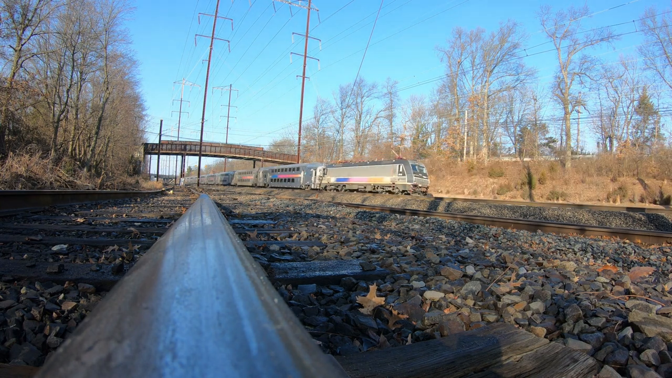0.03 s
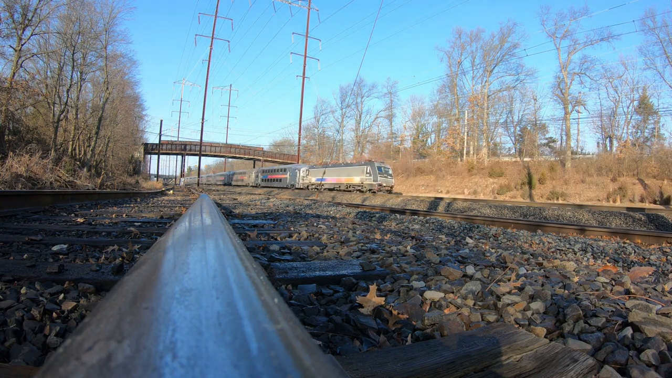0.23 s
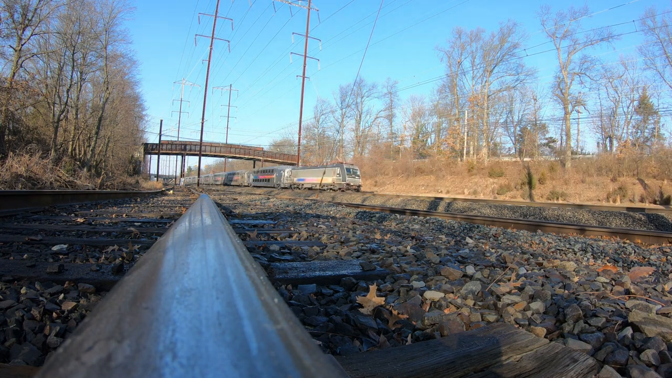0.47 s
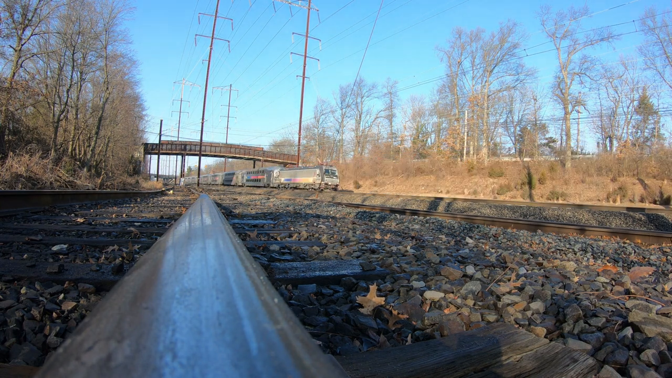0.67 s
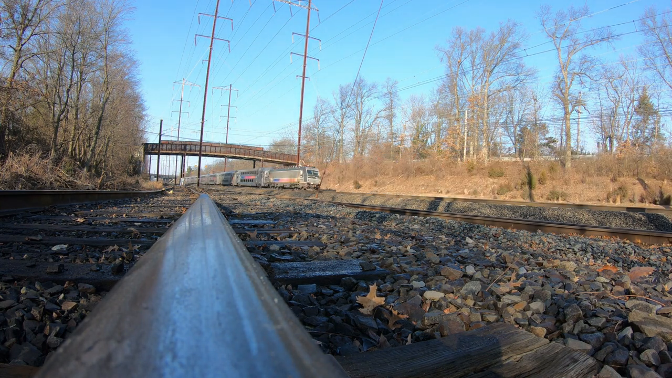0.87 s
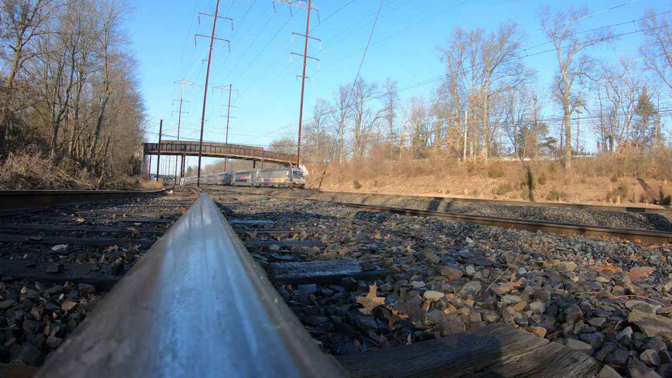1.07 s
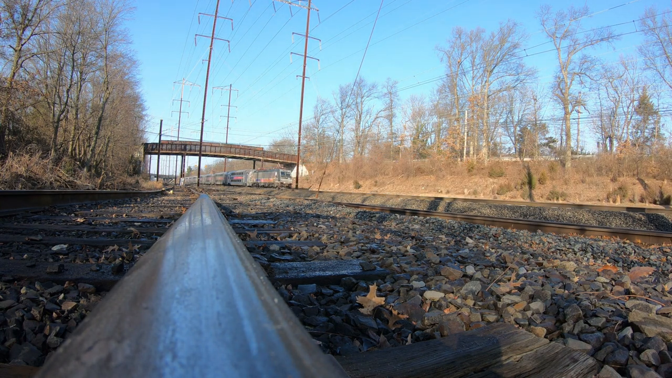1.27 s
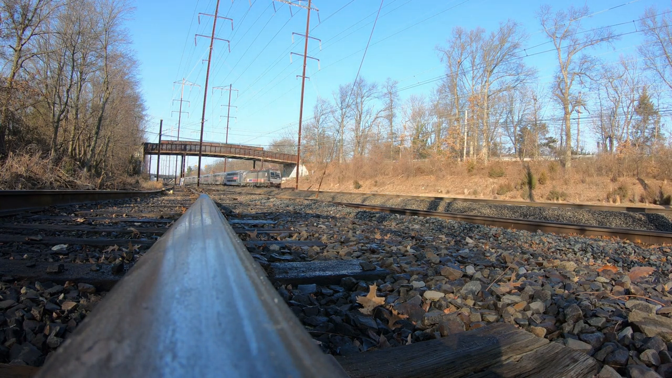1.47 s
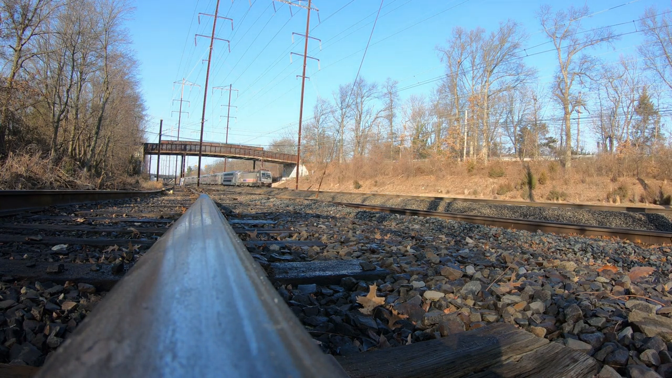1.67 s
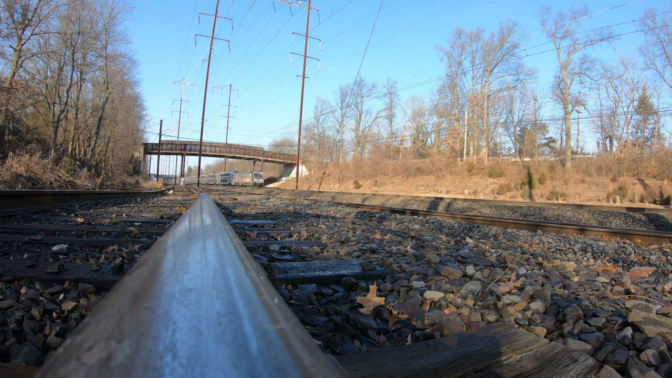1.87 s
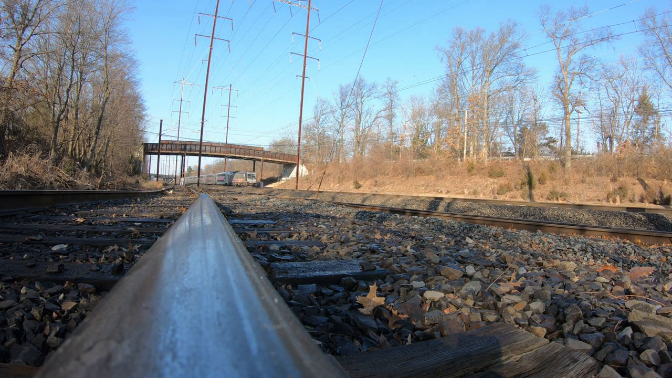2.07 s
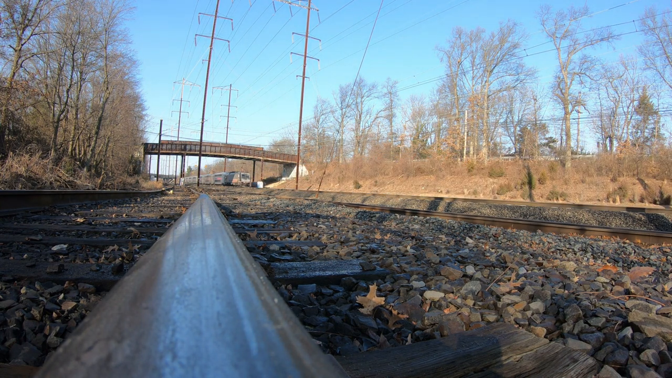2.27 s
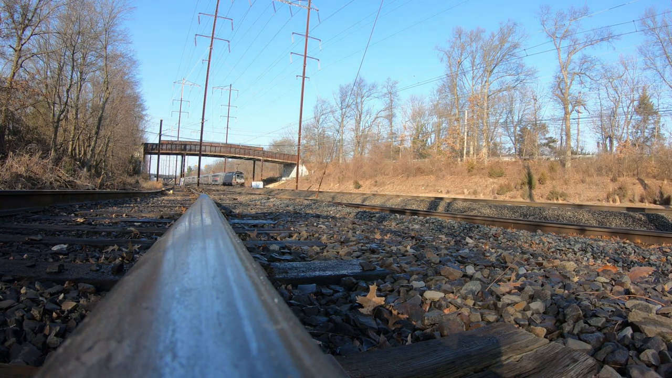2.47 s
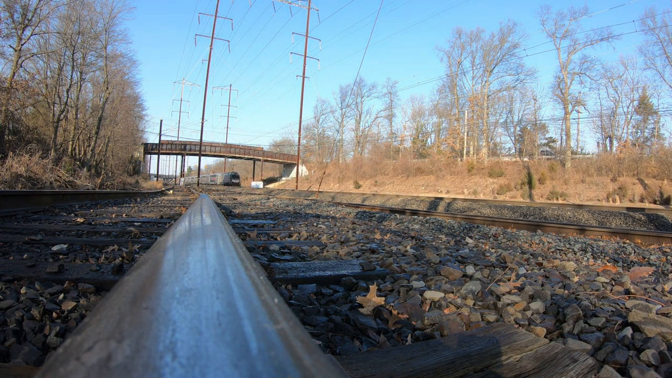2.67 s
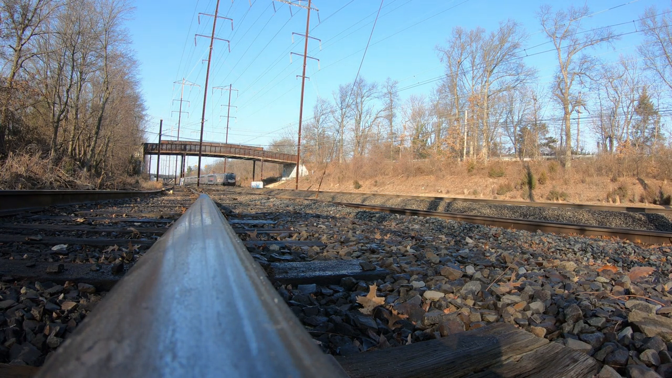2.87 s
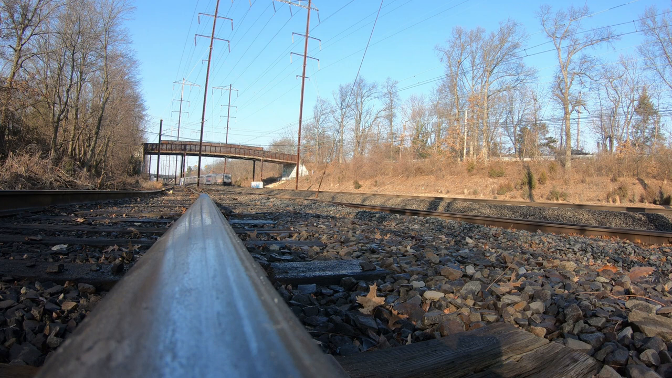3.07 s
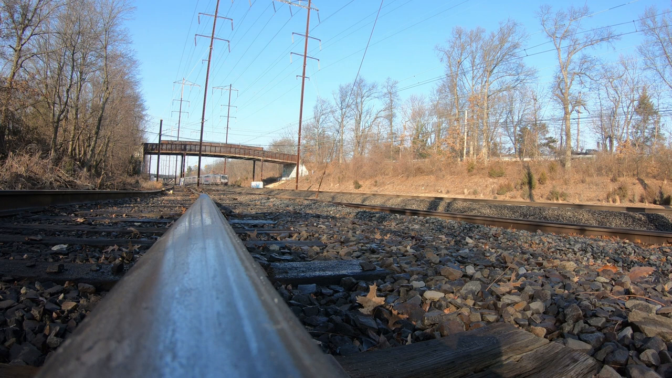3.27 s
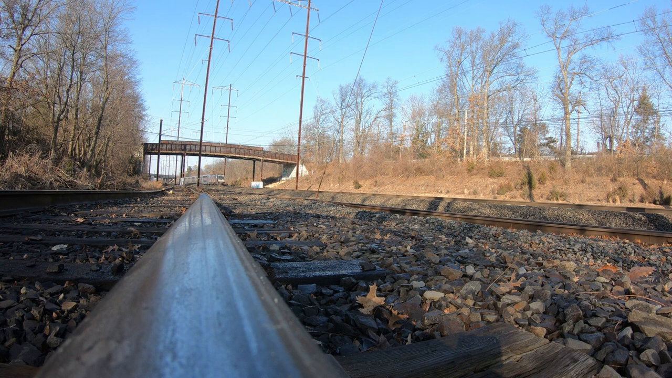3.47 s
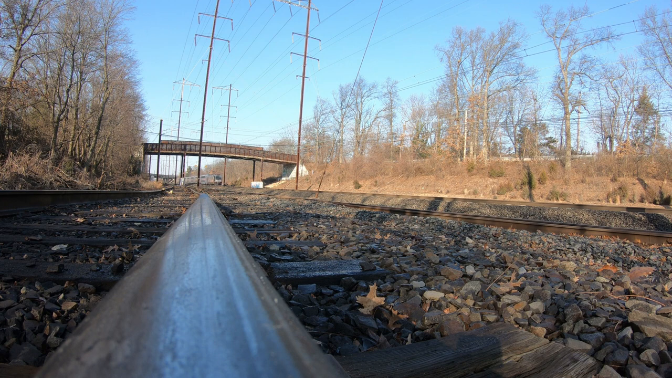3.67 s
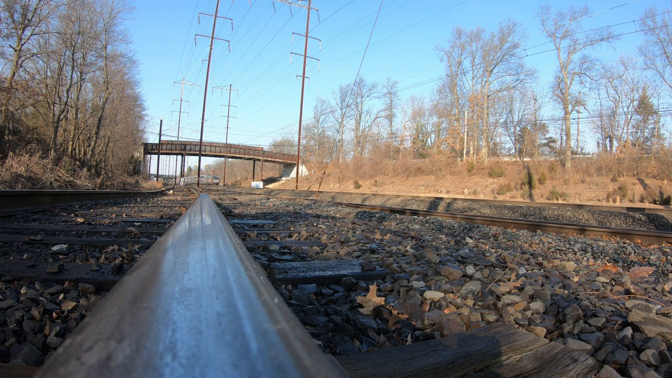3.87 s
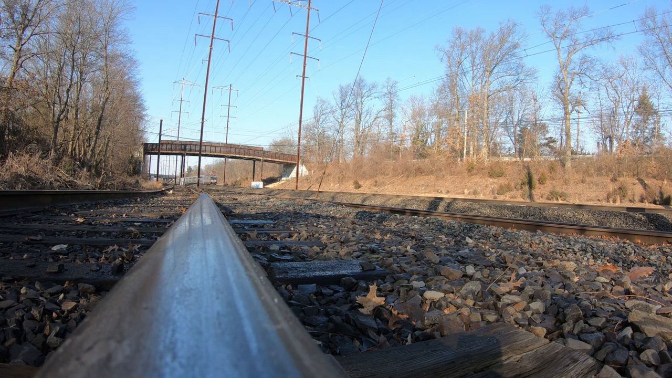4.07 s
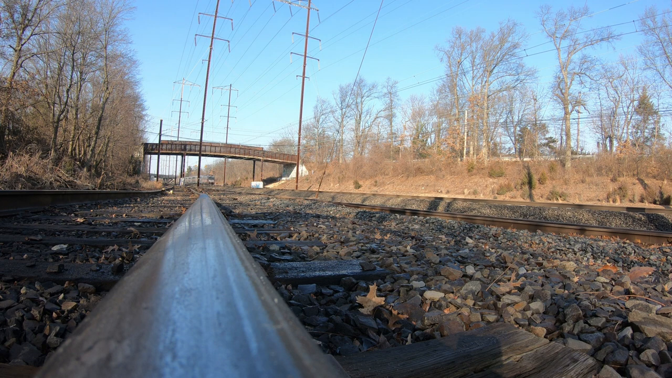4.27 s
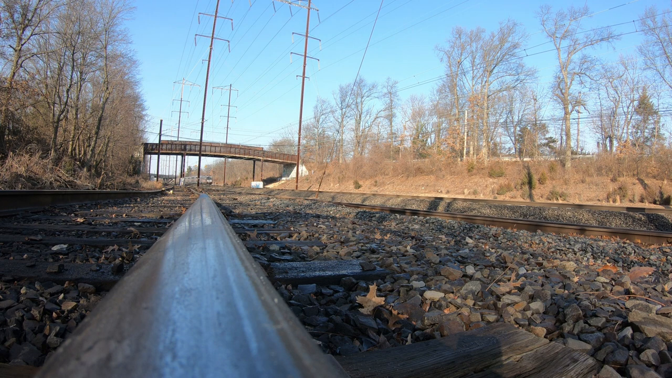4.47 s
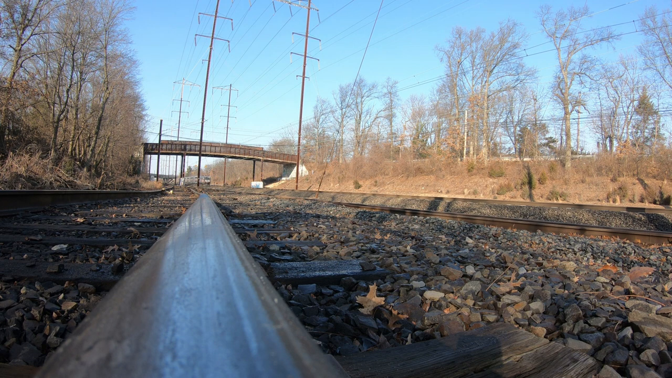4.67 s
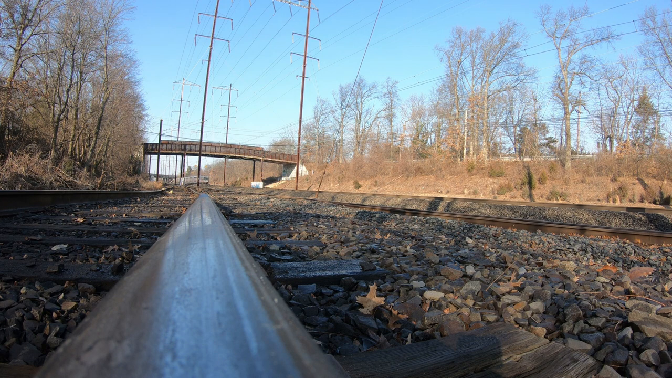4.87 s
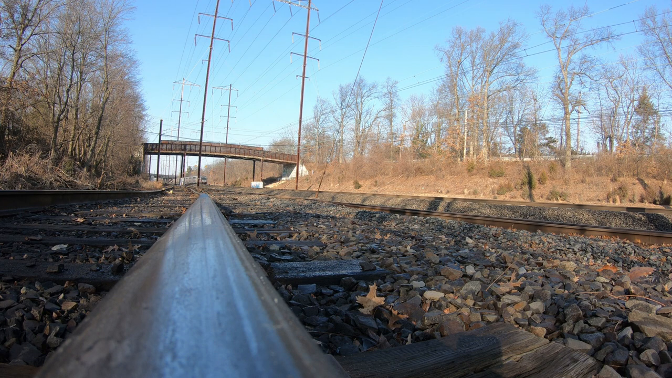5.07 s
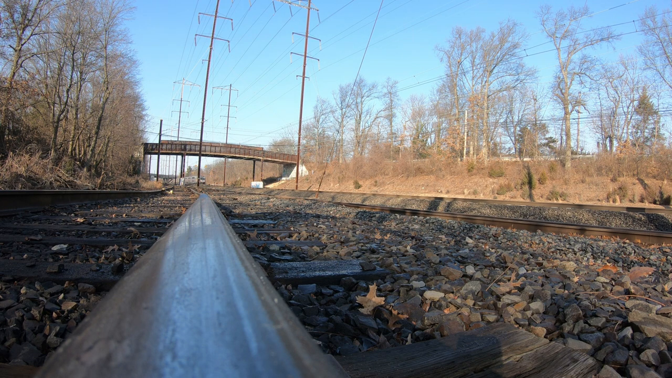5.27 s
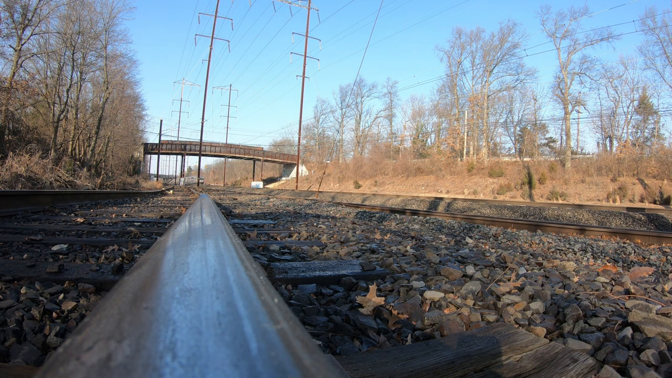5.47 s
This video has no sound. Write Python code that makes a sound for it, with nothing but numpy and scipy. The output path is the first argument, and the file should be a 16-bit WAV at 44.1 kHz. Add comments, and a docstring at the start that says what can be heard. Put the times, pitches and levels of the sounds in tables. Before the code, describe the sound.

Heavy low train rumble and hollow wheel roar draw away outdoors, treble dulling first, leaving a soft hum and brief high birdsong.

```python
"""An electric passenger train draws away along a neighbouring track, heard from just above a rail.
Broad noise and wandering low tones make its heaving rumble; resonant noise makes the wheel roar, whose
treble dies first with distance. A rough drive whine is a gliding tone with its own scatter.
Noise swells make scrubs and a fizz that comes and goes; near the end a small bird's gliding sines twitter."""
import sys
import numpy as np
from scipy import signal
from scipy.fft import rfft, irfft, next_fast_len
from scipy.io import wavfile
from scipy.ndimage import uniform_filter1d, minimum_filter1d

SR = 44100
rng = np.random.default_rng(int(sys.argv[2]) if len(sys.argv) > 2 else 0)


def pcm_store(signal):
    """Save signal as 16-bit PCM."""
    levels = np.round(np.clip(np.atleast_2d(signal), -1, 1) * 32767)
    wavfile.write(sys.argv[1], SR, levels.astype(np.int16).T)


N = 243431
TIME = np.arange(N) / SR
SIZE = next_fast_len(N, True)
BIN_HZ = np.maximum(np.fft.rfftfreq(SIZE, 1 / SR), 1)

# Stereo field, left minus right: f/Hz, level difference/dB
STEREO_LEAN = [(30, 10), (72, 15), (115, 15.5), (155, 12), (240, 10), (320, 9.5), (700, 0), (1150, -3),
               (1400, -6), (1750, -2.5), (2600, 0), (3400, -2.5), (5200, 2), (7900, 4.5), (10000, 0.5)]
# Coherence of left and right: f/Hz, coherence/1
COHERENCE = [(30, 0.5), (70, 1), (115, 0.99), (160, 0.57), (370, 0.77), (720, 1), (1450, 0.1), (1750, 0.3),
             (2200, 0.3), (3100, 0.4), (3900, 0.9), (5500, 0.29), (9000, 0.04), (13000, 0.33)]
# Phase by which the left leads: f/Hz, phase/rad
PHASE_LEAD = [(50, 0.9), (170, -1), (400, -1.77), (750, -2), (1350, -2.5), (1800, 0.27), (3800, -1.13),
              (7000, 1.6)]

# Spectrum of the open-air hiss: f/Hz, relative density/dB
AIR_SPECTRUM = [(5000, 0.5), (7500, -1.5), (8300, -6.5), (10000, -5)]
AIR_DB, FAR_ROAR_DB = -86, -61

# Bird's whistles, each a glide: t/s, length/s, start f/Hz, end f/Hz, level before flutter/dB
BIRD_NOTES = [(4.48, .045, 7500, 6950, -90), (4.53, .05, 7000, 7950, -80), (4.565, .05, 7900, 7700, -81),
              (4.58, 0.033, 7350, 7700, -81), (5.008, .045, 9350, 7900, -86),
              (5.045, 0.088, 7800, 7750, -82), (5.075, .04, 6150, 6800, -82), (5.12, 0.08, 7850, 7200, -80),
              (5.2, .145, 7500, 8000, -82), (5.34, 0.043, 7950, 7400, -85), (5.378, .028, 6100, 6330, -83)]
# Bird's toneless churrs: t/s, length/s, level before flutter/dB
BIRD_CHURRS = [(5.04, .05, -89), (5.13, .06, -85)]
# Bird's direct sound and its echoes from the trees: delay t/s, level/dB
BIRD_PATHS = [(0, 0), (.019, -8.5), (.043, -18)]
NOTE_EDGE_S, CHURR_HZ = 0.0092, 8300

# Spectrum of the sizzle: f/Hz, relative density/dB
SIZZLE_SPECTRUM = [(8000, 3.5), (10000, -4), (11000, -4.5), (12400, -3.5), (13400, -5.5), (14000, -11.5),
                   (15000, -23)]
# Spurts of sizzle: t/s, length/s, level before flicker/dB
SIZZLE_SPURTS = [(0.143, 0.18, -79), (0.408, 0.24, -75.5), (0.777, 0.22, -82), (1.31, .16, -80),
                 (1.68, .09, -83)]
SIZZLE_DB, SIZZLE_FOLLOWS = -83.5, 0.7   # fizz at midway; dB per dB of rolling level
SIZZLE_FLICKER_DB = 1.2

# Spectrum of a scrubbing wheel's hiss: f/Hz, relative density/dB
SCRUB_SPECTRUM = [(4200, 3.5), (5200, 0.5), (6500, -0.5), (7800, -0.5), (9300, -9.5), (11000, -18.5),
                  (13000, -28)]
# Moments when a wheel scrubs the rail: t/s, length/s, sing level/dB, hiss level/dB
SCRUB_EVENTS = [(.14, 0.38, -61, -73.5), (0.42, 0.088, -52, -75), (0.76, 0.32, -51, -63.5),
                (1.253, 0.42, -66, -74)]
SCRUB_HZ, SCRUB_WIDTH_HZ = 757, 82

# Strength of the wheels' hollow ringing: t/s, level/dB
RINGING_LEVEL = [(0, -67), (1.5, -69), (2.3, -61.5), (2.65, -56.5), (3.05, -61), (3.42, -59.5),
                 (3.75, -63.5), (5.52, -64.5)]
RINGING_HZ, RINGING_WIDTH_HZ = 725, 73

# Level of the direct drive whine before flutter: t/s, level/dB
WHINE_LEVEL = [(0, -68.5), (.8, -70.5), (1.35, -73.5), (1.65, -63), (2.03, -55), (2.3, -62.5), (2.56, -64),
               (2.8, -60), (3.13, -53), (3.42, -61.5), (3.6, -67.5), (3.8, -65.5), (4.27, -61.5),
               (4.6, -67.5), (5.25, -65.5), (5.52, -71)]
WHINE_HZ, WHINE_RISE_HZ_PER_S = 686.3, 1.35
WHINE_SCATTER, WHINE_BLUR_HZ = .95, 20   # scatter relative to the direct tone; its spread
OCTAVE_DB, OCTAVE_FOLLOWS = -70, 0.64   # octave at the whine's mean level; dB per dB of the whine

# Common level of the hum, which outlasts the rumble: t/s, level/dB
HUM_LEVEL = [(0, -41.5), (.9, -33), (2.4, -38), (3.8, -41), (5.52, -42.5)]
# Resonances of the hum: f/Hz, width/Hz, relative level/dB, left minus right/dB
HUM_RESONANCES = [(108, 12.2, -0.5, 1), (242.9, 13, -19, 8)]

# Surges of wheelsets on the track bed: t/s, length/s, f before wander/Hz, level before unevenness/dB
SURGE_EVENTS = [(0.185, 0.12, 76, -22.5), (0.25, 0.15, 45, -23), (0.419, 0.14, 78, -25.5),
                (0.665, 0.16, 77, -22.5), (1.182, 0.26, 52, -22.5), (1.832, 0.44, 53, -26),
                (2.282, 0.11, 54, -22.5), (2.998, 0.18, 52, -28.5), (3.14, 0.063, 79, -22.5),
                (3.46, 0.16, 53, -26.5), (3.818, 0.25, 53, -27), (4.142, 0.17, 55, -31),
                (4.484, .14, 52, -30), (5.042, 0.2, 52.1, -31.5)]
# Level of the lower rumble before bass limiting: t/s, level/dB
RUMBLE_LEVEL = [(0, -21.5), (.3, -25.5), (.55, -26.5), (.95, -24.5), (1.36, -23), (1.46, -31), (1.7, -23.5),
                (2.03, -24), (2.14, -30.5), (2.24, -25), (2.42, -23), (2.55, -26.5), (2.9, -29.5),
                (3.25, -28.5), (3.8, -29.5), (4.0, -30.5), (4.27, -27.5), (4.35, -36.5), (4.45, -37),
                (4.65, -30.5), (4.82, -34.5), (5.05, -31), (5.29, -37), (5.38, -34), (5.52, -33.5)]
# Level of the upper rumble before bass limiting: t/s, level/dB
DRONE_LEVEL = [(0, -40), (1.3, -43), (1.8, -41), (2.48, -43.5), (2.68, -46), (3.16, -45.5), (3.7, -47.5),
               (4.32, -44.5), (5.52, -48.5)]
# Spectrum of the rumble: f/Hz, relative density/dB
RUMBLE_SPECTRUM = [(10, -34.5), (20, -19), (30, -10), (41, -1), (52, 0), (65, 1.5), (77, -1.5), (92, -4),
                   (120, -9.5), (150, -14.5), (200, -21), (245, -25.5), (280, -32.5), (400, -32)]

# Guide level of the receding rolling noise, steering registers and sizzle: t/s, level/dB
ROLLING_LEVEL = [(0, -54), (.56, -57.5), (.95, -58), (1.7, -59), (2.04, -60), (2.56, -58.5), (3.12, -61),
                 (3.7, -63), (4.28, -64), (4.8, -66), (5.52, -67.8)]
# Level of the wheels' low roar before flicker: t/s, level/dB
ROAR_LEVEL = [(0, -47), (1.3, -50), (2.1, -50.5), (2.3, -50), (3.5, -53), (3.8, -56), (5.08, -57),
              (5.52, -55.5)]
# Spectrum of the rolling noise: f/Hz, relative density/dB
ROLLING_SPECTRUM = [(250, 5), (380, -2), (480, -2.5), (720, -0.5), (1000, -2.5), (1400, -4), (1550, -7.5),
                    (1950, -8), (2250, -11), (3200, -14), (3950, -14.5), (4250, -18.5), (5200, -23.5),
                    (7500, -26), (9500, -37.5)]
# Ringing of wheels and rail: f/Hz, width/Hz, level above the roar/dB
RAIL_RESONANCES = [(473, 75, 5), (581, 24, 4.5), (640, 68, 1.5), (758, 22, 2), (1370, 90, 1),
                   (1850, 110, 2)]
# Registers above the roar, the higher fading faster:
# low f/Hz, high f/Hz, midway level/dB, slope/(dB per dB of rolling level), flicker/dB
ROLLING_REGISTERS = [(1089, 2123, -53.5, 0.89, 0.17), (2162, 4005, -58.5, 1.24, 0.67),
                     (4170, 6730, -68.5, 1.77, 0.65), (7000, 11000, -80.5, 3, 1.2)]
# Balance of the wheels, shifting slightly right: t/s, left minus right/dB
WHEEL_BALANCE = [(0, 0.4), (1.2, -0.5), (2.4, -0.1), (5.52, -1.5)]
MIDWAY_DB = -58.5   # rolling level at which the registers have their midway levels
FLICKER_PER_S = 5.2

BASS_LIMIT_DB, BASS_SPLIT_HZ, LIMITER_S = -12.5, 160, 0.023   # threshold, upper edge, smoothing
CUTOFF_HZ = 15100


def from_db(db):
    """Amplitude ratio: a level in decibels is twenty times its decimal logarithm."""
    return 10 ** (np.asarray(db) / 20)


def rms_one(pair):
    """Normalization: a stereo pair is scaled until the mean of its channels has rms 1."""
    middle = pair.mean(0)
    return pair / np.sqrt(np.mean(middle ** 2) + 1e-20)


def in_time(rows):
    """Linear interpolation: the columns of a curve at every sample."""
    s, *columns = np.transpose(rows)
    return [np.interp(TIME, s, c) for c in columns]


def at_hz(points, hz):
    """Logarithmic pitch scale: a table is interpolated over log frequency."""
    f, value = np.transpose(points)
    return np.interp(np.log(hz), np.log(f), value)


def drift(rate_hz):
    """Random modulation: low-passed noise of unit spread, 6 dB down at the given rate."""
    spectrum = rfft(rng.standard_normal(SIZE)) / (1 + (BIN_HZ / rate_hz) ** 2)
    slow = irfft(spectrum, SIZE)[:N]
    return slow / slow.std()


def ports(hz):
    """Interaural principle: level and phase differences as complex gains of two microphone ports."""
    half_level = from_db(at_hz(STEREO_LEAN, hz) / 2)
    left = half_level * np.exp(.5j * at_hz(PHASE_LEAD, hz))
    return np.array([left, 1 / left])


def noise_field(colour, modes=()):
    """Partial coherence: a shared direct part plus a scattered part at each port, shaped by resonances."""
    white = rfft(rng.standard_normal((3, SIZE)))
    alike = np.clip(at_hz(COHERENCE, BIN_HZ), 0, .99)
    gains = ports(BIN_HZ)
    field = gains * (np.sqrt(alike) * white[0] + np.sqrt(1 - alike) * white[1:])
    direct_power = alike * abs(gains.sum(0)) ** 2
    scattered_power = (1 - alike) * (abs(gains) ** 2).sum(0)
    middle = np.sqrt(direct_power + scattered_power)
    peaks_db = sum(db / (1 + (2 * (BIN_HZ - hz) / width) ** 2) for hz, width, db in modes)
    return field / middle * from_db(at_hz(colour, BIN_HZ) + peaks_db)


def band(field, low_hz, high_hz, order=14):
    """Band-pass filtering: one register of a noise field with smooth edges, rms 1."""
    low_edge = 1 / (1 + (low_hz / BIN_HZ) ** order)
    high_edge = 1 / (1 + (BIN_HZ / high_hz) ** order)
    return rms_one(irfft(field * low_edge * high_edge, SIZE)[:, :N])


def steady(pair, seconds):
    """Envelope equalization: division by the running rms evens out a noise's slow swells."""
    width = max(int(seconds * SR), 2)
    power = uniform_filter1d(uniform_filter1d(pair.mean(0) ** 2, width), width)
    return pair / np.sqrt(power + 1e-9)


def swell(s, length_s, db):
    """Gaussian envelope: a gain centred on s, length_s wide at half height."""
    return from_db(db) * .5 ** ((2 * (TIME - s) / length_s) ** 2)


def carrier(pitch_hz):
    """Phase is the integral of frequency: a complex oscillation on a moving pitch."""
    return np.exp(2j * np.pi * np.cumsum(pitch_hz) / SR)


def tone(pitch_hz):
    """Simple harmonic motion: a sine on a moving pitch at both ports, rms 1."""
    return rms_one(np.real(ports(pitch_hz.mean())[:, None] * carrier(pitch_hz)))


def narrow_noise(pitch_hz, width_hz):
    """Random modulation of a carrier: a noise band 6 dB down width_hz either side, rms 1."""
    envelope = drift(width_hz) + 1j * drift(width_hz)
    return rms_one(np.real(ports(pitch_hz.mean())[:, None] * carrier(pitch_hz) * envelope))


def nearness_db():
    """Level difference: how far the rolling noise stands above its midway value."""
    return in_time(ROLLING_LEVEL)[0] - MIDWAY_DB


def air():
    """Masking: steady open-air hiss and a dull far roar are uncovered as the train fades."""
    field = noise_field(AIR_SPECTRUM)
    hiss = from_db(AIR_DB) * band(field, 4500, 10000)
    far_roar = from_db(FAR_ROAR_DB) * band(field, 210, 380)
    return hiss + far_roar


def bird(rasp_hz=150, flutter_db=2.0, left_db=5.0):
    """Frequency modulation and reflection: rough glides and churrs on the left, echoed by trees."""
    voice, rasp = 0, rasp_hz * drift(400)
    for s, length_s, start_hz, end_hz, db in BIRD_NOTES:
        pitch_hz = np.interp(TIME, [s, s + length_s], [start_hz, end_hz]) + rasp
        sounding = np.clip(np.minimum(TIME - s, s + length_s - TIME) / NOTE_EDGE_S, 0, 1)
        voice = voice + sounding * from_db(db) * carrier(pitch_hz).imag
    churr_gain = sum(swell(*churr) for churr in BIRD_CHURRS)
    voice = voice + churr_gain * narrow_noise(np.full(N, CHURR_HZ), width_hz=600).mean(0)
    voice = voice * from_db(flutter_db * drift(50))
    heard = sum(from_db(db) * np.pad(voice, (int(abs(s) * SR), 0))[:N] for s, db in BIRD_PATHS)
    return heard * from_db([[left_db], [-left_db]])   # left raised, right lowered


def sizzle(grain_db=1.0):
    """Addition of powers: a grainy fizz follows the rolling level, with early spurts added."""
    fizz_power = from_db(SIZZLE_DB + SIZZLE_FOLLOWS * nearness_db()) ** 2
    spurt_power = sum(swell(*spurt) ** 2 for spurt in SIZZLE_SPURTS)
    unevenness = from_db(grain_db * drift(120) + SIZZLE_FLICKER_DB * drift(8))
    return np.sqrt(fizz_power + spurt_power) * unevenness * band(noise_field(SIZZLE_SPECTRUM), 9000, 15500)


def scrub():
    """Friction excitation: a wheel rubbing sideways sings in a broad, hoarse resonance and hisses."""
    sing_gain = sum(swell(s, length_s, sing_db) for s, length_s, sing_db, _ in SCRUB_EVENTS)
    hiss_gain = sum(swell(s, length_s, hiss_db) for s, length_s, _, hiss_db in SCRUB_EVENTS)
    sing = sing_gain * narrow_noise(np.full(N, SCRUB_HZ), SCRUB_WIDTH_HZ)
    return sing + hiss_gain * band(noise_field(SCRUB_SPECTRUM), 4200, 13000)


def ringing():
    """Resonance: the wheels ring hoarsely, most of all while the train rounds the bend."""
    gain = from_db(in_time(RINGING_LEVEL)[0])
    return gain * narrow_noise(np.full(N, RINGING_HZ), RINGING_WIDTH_HZ)


def whine(waver_hz=1.38, flutter_db=1.7, octave_blur_hz=10):
    """Scattering: banks and trees roughen a rising gear tone; its octave arrives as scatter only."""
    first_db, = in_time(WHINE_LEVEL)
    octave_db = OCTAVE_DB + OCTAVE_FOLLOWS * (first_db - first_db.mean())
    pitch_hz = WHINE_HZ + WHINE_RISE_HZ_PER_S * TIME
    direct = from_db(flutter_db * drift(17)) * tone(pitch_hz + waver_hz * drift(8.4))
    first = direct + WHINE_SCATTER * narrow_noise(pitch_hz, WHINE_BLUR_HZ)
    octave = narrow_noise(2 * pitch_hz, octave_blur_hz)
    return from_db(first_db) * first + from_db(octave_db) * octave


def hum():
    """Resonance: two narrow bands of noise make a low, hollow, restless hum."""
    sound = 0
    for hz, width_hz, db, lean_db in HUM_RESONANCES:
        middle = narrow_noise(np.full(N, hz), width_hz).mean(0)
        sound = sound + from_db(db) * middle * from_db([[lean_db / 2], [-lean_db / 2]])
    return from_db(in_time(HUM_LEVEL)[0]) * sound


def boom(waver_hz=2.005, uneven_db=3.5):
    """Mass on a spring: wheelsets bounce on the track bed in swells of a low, wandering pitch."""
    wander_hz = waver_hz * drift(9.2)
    unevenness = from_db(uneven_db * drift(15))
    surges = sum(swell(s, length_s, db) * tone(hz + wander_hz) for s, length_s, hz, db in SURGE_EVENTS)
    return unevenness * surges


def rumble():
    """Forced vibration: the cars and the ground under them shake in a broad, dark noise."""
    (rumble_db,), (drone_db,) = in_time(RUMBLE_LEVEL), in_time(DRONE_LEVEL)
    field = noise_field(RUMBLE_SPECTRUM)
    body = from_db(rumble_db) * steady(band(field, 10, 124.0), seconds=0.065)
    drone = from_db(drone_db) * steady(band(field, 130.3, 315), seconds=0.75)
    return body + drone


def rolling():
    """Roughness excitation and air absorption: rails ring and roar; the treble fades fastest."""
    field, near_db = noise_field(ROLLING_SPECTRUM, RAIL_RESONANCES), nearness_db()
    roar_db = in_time(ROAR_LEVEL)[0] + 0.69 * drift(8.3)
    sound = from_db(roar_db) * band(field, 291.0, 1068)
    for low_hz, high_hz, db, follows, flicker_db in ROLLING_REGISTERS:
        level_db = db + follows * near_db + flicker_db * drift(FLICKER_PER_S)
        sound = sound + from_db(level_db) * band(field, low_hz, high_hz)
    return sound


def scene():
    """Superposition: the open air, the bird and the receding train add linearly."""
    lean_db, = in_time(WHEEL_BALANCE)
    wheels = rolling() * from_db([lean_db / 2, -lean_db / 2])
    background = air() + bird()
    details = sizzle() + scrub() + ringing() + whine()
    return background + details + hum() + boom() + rumble() + wheels


def limit_bass(pair):
    """Gain reduction: the bass is turned down briefly when peaks of the whole sound pass a threshold."""
    bass = irfft(rfft(pair, SIZE) / (1 + (BIN_HZ / BASS_SPLIT_HZ) ** 2) ** 2, SIZE)[:, :N]
    width = max(int(LIMITER_S * SR), 2)
    allowed = np.minimum(1, from_db(BASS_LIMIT_DB) / (abs(pair).max(0) + 1e-9))
    bass_gain = uniform_filter1d(minimum_filter1d(allowed, width), width)
    return pair - bass * (1 - bass_gain)


def record(dry):
    """Limiting and low-pass filtering: bass held down, 3 ms fades at both ends, top cut steeply."""
    ease = np.minimum(1, np.minimum(TIME, TIME[::-1]) / .003)
    low_pass = signal.ellip(10, .1, 80, CUTOFF_HZ, fs=SR, output="sos")
    return signal.sosfilt(low_pass, limit_bass(dry) * ease)


dry = scene()
out = record(dry)
pcm_store(out)
```